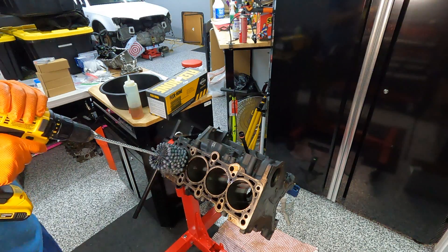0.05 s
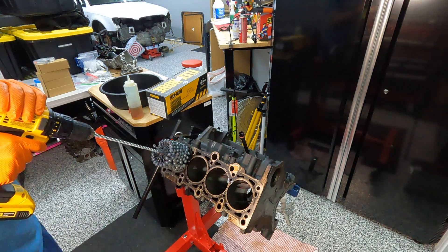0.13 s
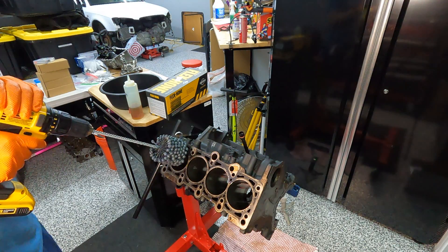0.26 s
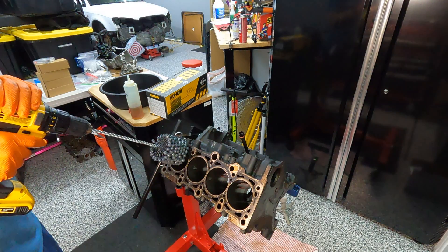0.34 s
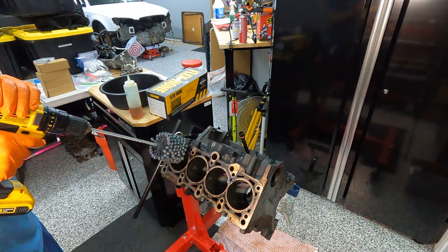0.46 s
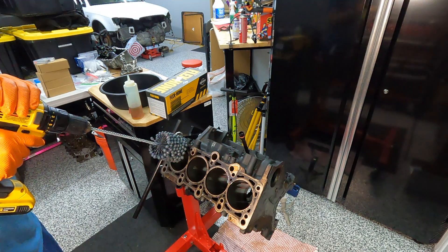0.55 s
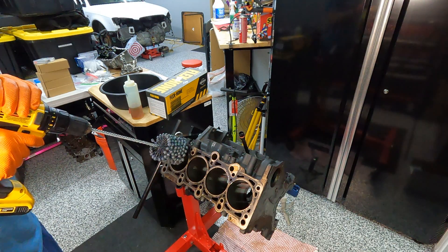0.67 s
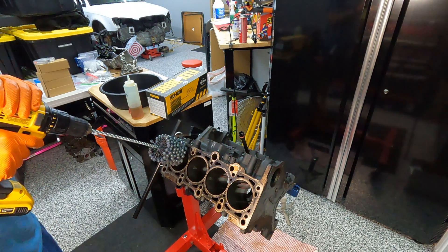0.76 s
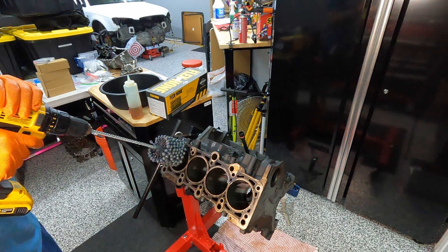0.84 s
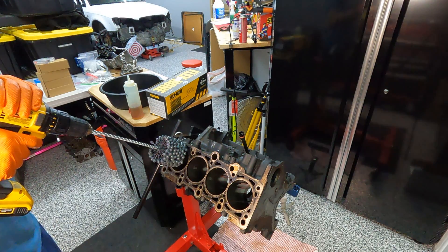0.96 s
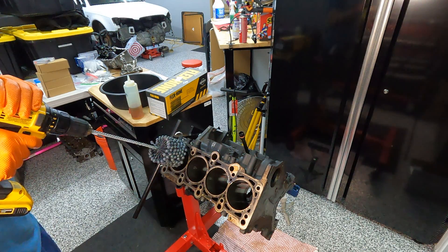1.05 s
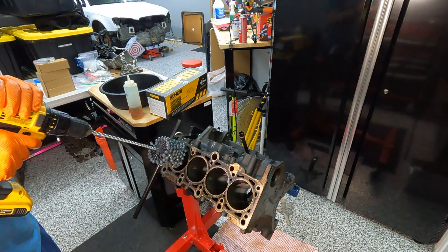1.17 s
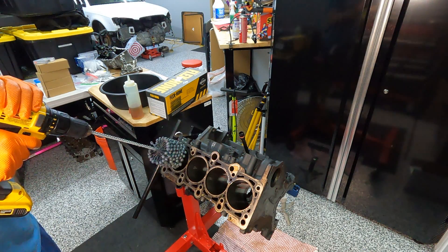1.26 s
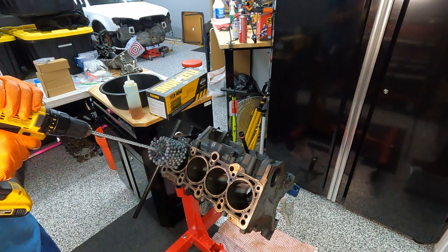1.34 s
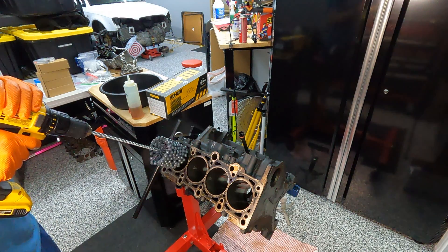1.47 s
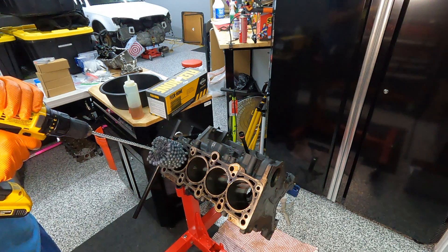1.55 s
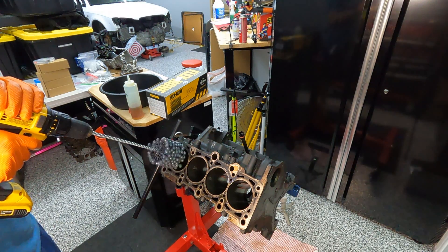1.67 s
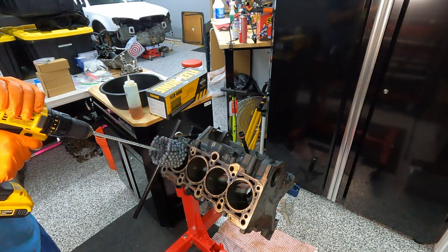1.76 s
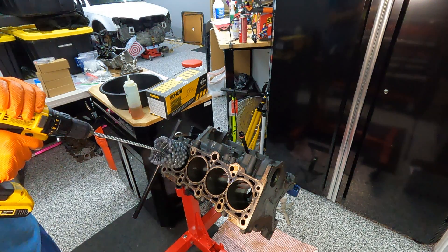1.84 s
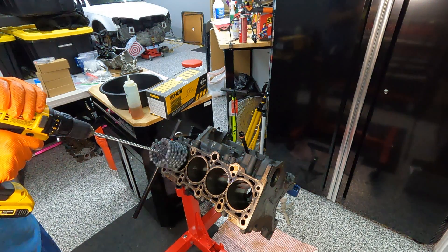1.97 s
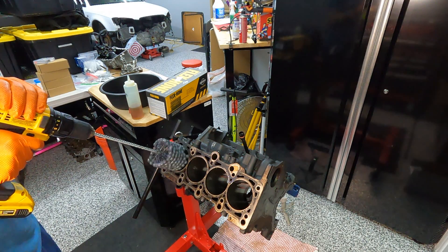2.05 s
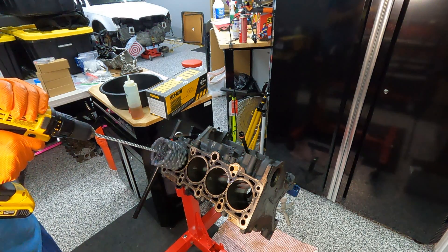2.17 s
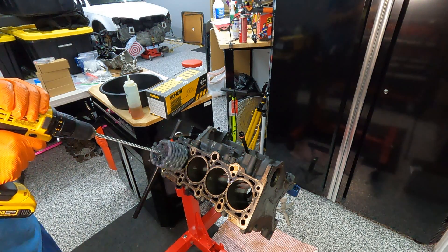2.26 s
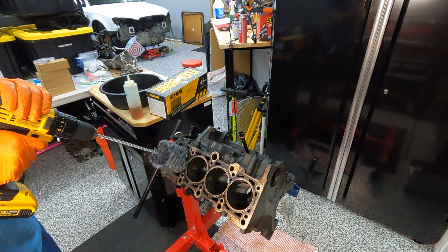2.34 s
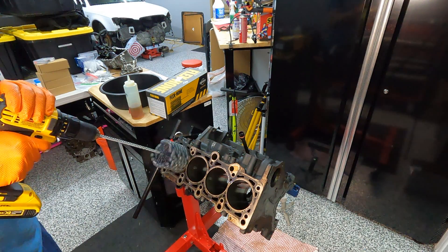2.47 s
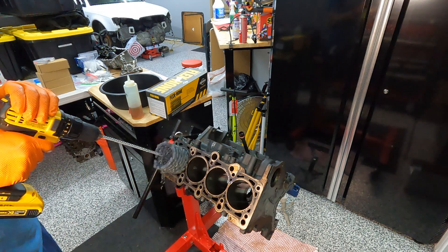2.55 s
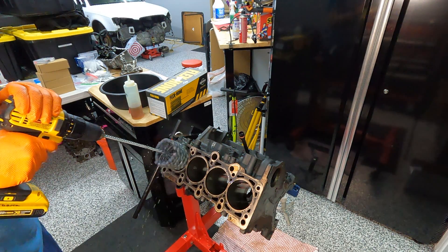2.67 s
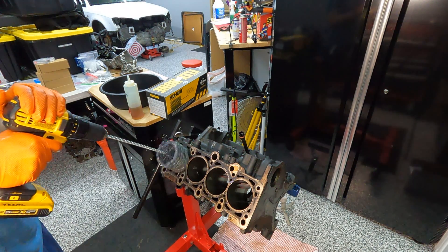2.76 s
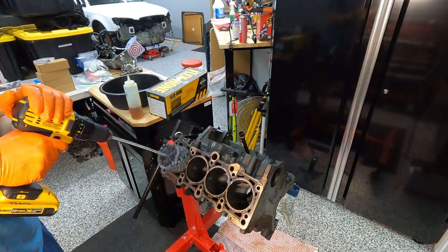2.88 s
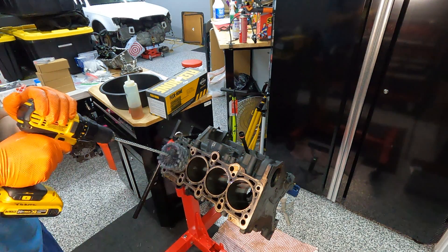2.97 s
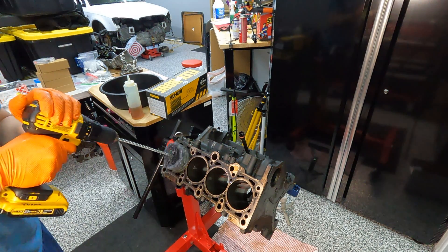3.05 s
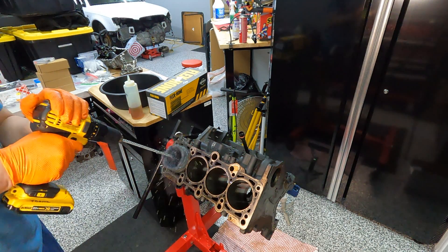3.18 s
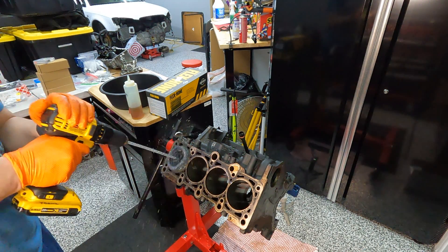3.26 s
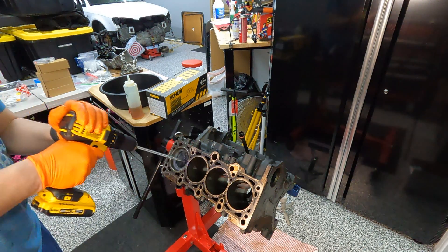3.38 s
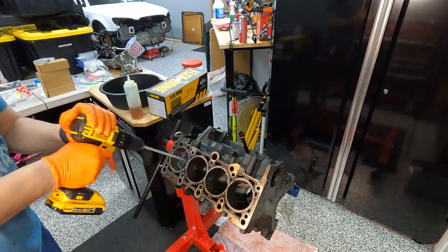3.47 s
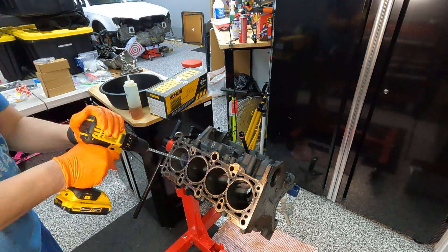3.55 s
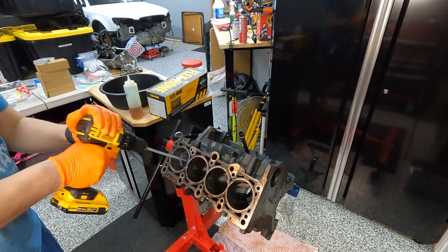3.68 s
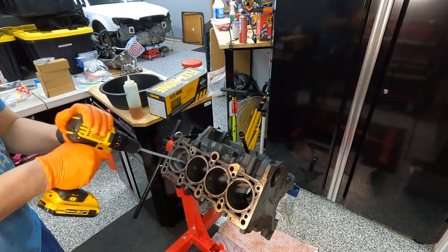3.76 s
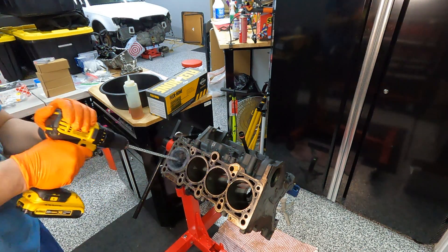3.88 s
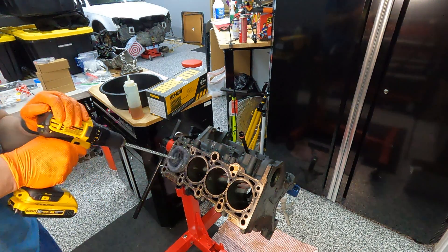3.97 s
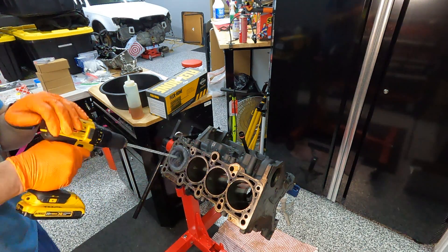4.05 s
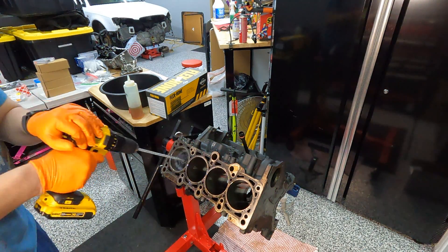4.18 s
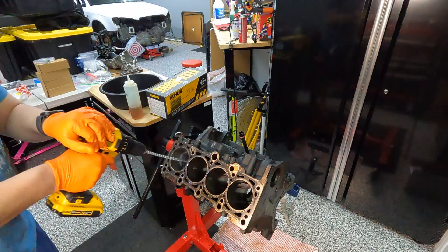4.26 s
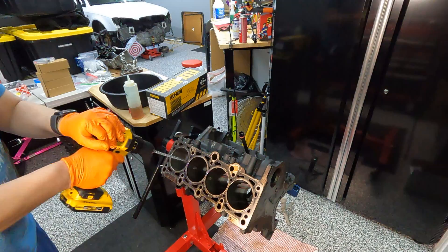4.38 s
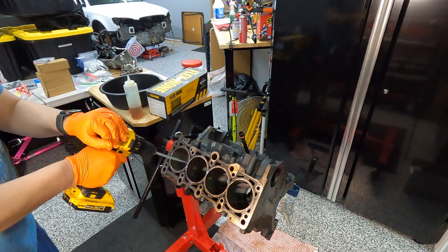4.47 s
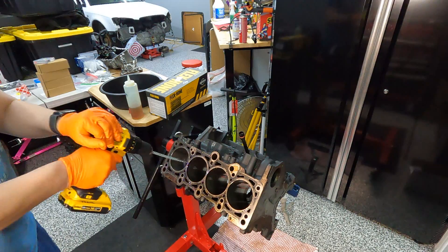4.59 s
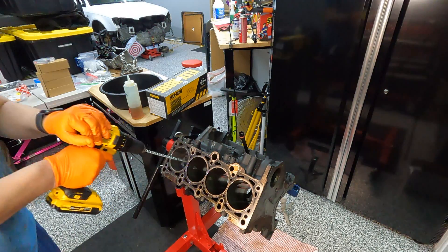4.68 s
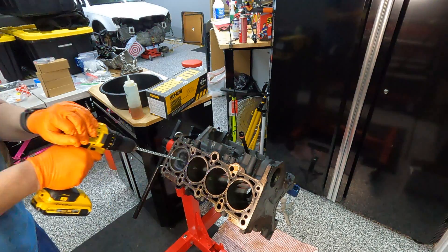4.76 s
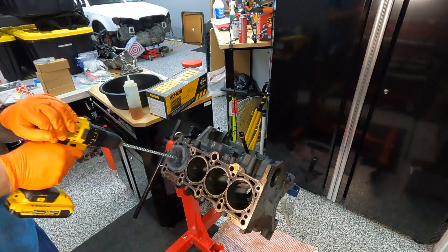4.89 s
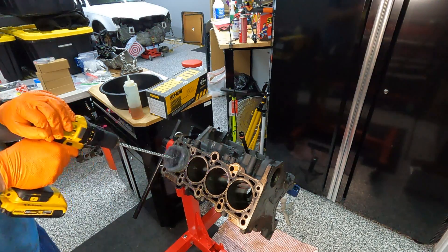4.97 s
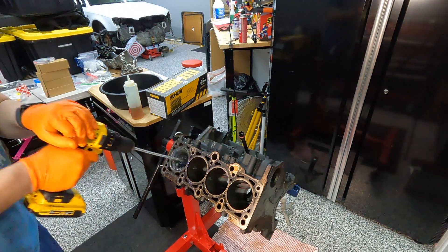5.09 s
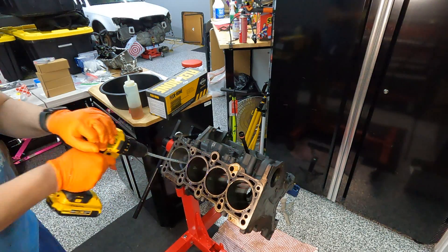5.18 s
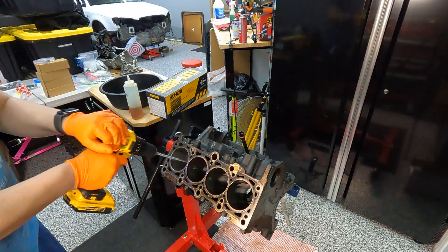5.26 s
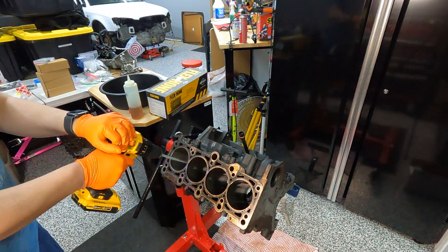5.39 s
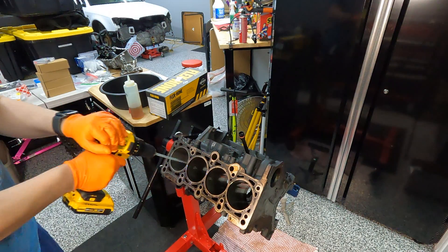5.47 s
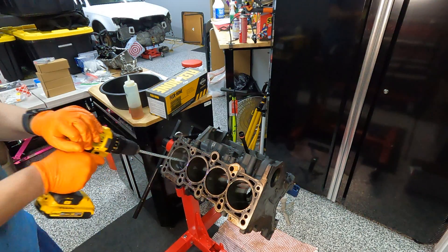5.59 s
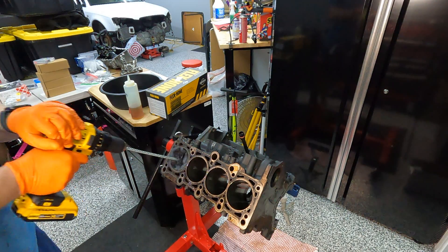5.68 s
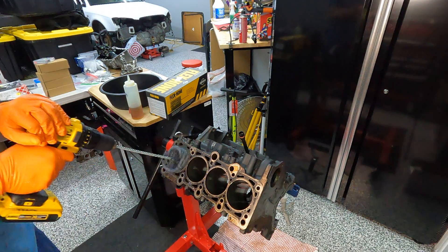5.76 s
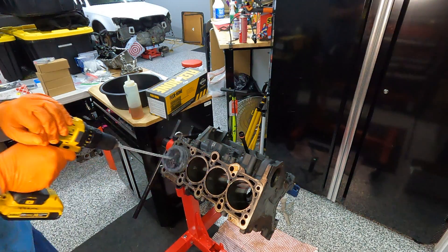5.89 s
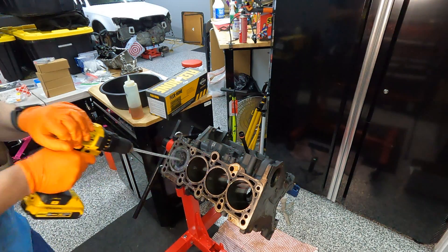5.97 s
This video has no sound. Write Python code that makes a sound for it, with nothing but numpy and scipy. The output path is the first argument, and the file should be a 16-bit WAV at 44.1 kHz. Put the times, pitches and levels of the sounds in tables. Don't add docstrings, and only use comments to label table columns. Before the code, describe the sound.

Faint low rubbing and short glove rustles come first over very quiet room tone. Then a drill motor starts small and whistling, rises in pitch for about two seconds and surges into a loud, wavering, multi-toned whine with airy hiss. Gritty scrapes come and go over it, ringing the iron block, while the whine sags slightly under load. Near, fairly dry garage sound, leaning left, still running at the end.

```python
import sys
import numpy as np
from scipy import signal
from scipy.io import wavfile
from scipy.ndimage import uniform_filter1d

SR = 44100
rng = np.random.default_rng(int(sys.argv[2]) if len(sys.argv) > 2 else 0)


def attenuation_scalar(level_db):
    decades = np.asarray(level_db, float) / 20
    return 10 ** decades


def transcribe(u):
    v = np.clip(np.atleast_2d(u).T, -1, 1)
    q = np.round(v * 32767).astype(np.int16)
    wavfile.write(sys.argv[1], SR, q)


N = 265923
HOP, SIZE = 256, 1024
T = np.arange(N) / SR
HZ = np.fft.rfftfreq(SIZE, 1 / SR)[:, None]
FRAME_T = np.arange(N // HOP + 5) * HOP / SR

# time in seconds, shaft speed asked for in Hz.
TRIGGER = [(1.29, 30), (1.323, 38), (1.55, 42), (1.639, 67.3), (1.76, 76.5), (1.84, 76.5), (1.93, 94),
           (2.095, 107), (2.195, 151), (2.413, 177.3), (2.608, 182), (2.765, 180.4), (2.964, 164.7),
           (3.063, 147.7), (3.141, 215.8), (3.201, 221.3), (3.282, 369.3), (3.616, 382.1)]
START_S = TRIGGER[0][0]
INERTIA_S, FULL_HZ = 0.065, 370
# middle in seconds, length in seconds, speed lost in Hz.
DRAGS = [
    (3.802, .688, 13.7),
    (4.266, .362, 9.6),
    (4.71, .568, 24.9),
    (5.548, .756, 25.4),
]

STRONG_ORDERS = (10, 16, 19, 20)
# full-speed level in dB, rise in dB per octave, share of the shade 0-1.
STRONG_DB = [(-38.5, 11.5, 0.2), (-39.5, 10, 0.28), (-37, 19, 0.4), (-36.5, 13, 0.78)]
# centre in Hz, width in Hz, lift in dB.
CASE_MODES = [(670, 180, 17), (1786, 290, 16), (2470, 540, 6.5), (5400, 350, -1), (2970, 130, 8.5)]
# time in seconds, lift of each strong order in dB.
GLINTS = [(3.25, 1.5, 7.5, -6, 4), (3.45, 3.5, 6, 3, 2), (3.65, -1, 1.5, 3, 6.5), (3.9, -0.5, 3, 3, 7),
          (4.1, 7.5, 10, 2, 0), (4.5, 8.5, 0.5, 0, 1), (4.8, 2.5, 5.5, -2, -4), (5.1, 9, 2.5, 0.5, -2),
          (5.3, 5, 4.5, 2, -7), (5.47, 4.5, 2, -0.5, 8), (5.72, 5, 4, 5, 8), (5.92, 8.5, -3, 5.5, 0.5)]
GLINT_S = 0.26
FADING_DB = 1.5
# dB at half speed, dB at full speed.
FLUTTER_DB = (1.3, 3.4)
STRONG_TORQUE = 0.49

LOW_ORDERS = (1, 2, 4)
LOW_DB = (-3, -1, 4)
UNBALANCE_DB = -53
UNBALANCE_OCTAVE_DB = (15.0, 16, 16.5)
# centre in Hz, width in Hz, lift in dB.
GRIP_MODE = [(180, 110, 8)]

WEAK_ORDERS = (18, 29, 30, 31, 32, 38, 39, 40, 41, 42, 47, 49, 50, 51, 59, 60, 63, 64, 68, 70, 79, 80, 90)
WEAK_DB = (-6.5, 0, 3.5, -8, -1.5, -20, 0.5, 1.5, -9, -1.5, -14, 5, -1, -8, 0, -7, 0, -17, 2, -11, -8, 0.5,
           1)
# centre in Hz, width in Hz, lift in dB.
HOUSING = [(2380, 1400, 7), (4500, 770, 7), (5920, 630, 9), (7750, 1600, 7)]
HOUSING_EDGE_HZ, HOUSING_FALL_DB = 7100, 28
DRIVE_DB, DRIVE_OCTAVE_DB, TORQUE_DB = -39.5, 9.5, 1
SIDE_OCTAVE_DB = 0.5
STIRS_HZ, STIRS_DB = 60, 7.0
FULL_ON_LIFT_DB = {30: 5, 38: 6, 40: 6}
FULL_ON_S = 0.2
RADIATES_HZ, RADIATES_DB = 1000, 22.0
# time in seconds, level change in dB.
SHADE = [
    (4.2, -0.5),
    (4.6, -5.5),
    (5.0, -8.5),
    (5.3, -5.5),
    (5.6, -15),
    (6.03, -8),
]

SWITCH_HZ = 3926
SWITCH_PARTS = [(1, 0), (1, -2), (1, 2), (1, -10), (1, 10), (2, -1), (2, 0), (2, 1), (2, -2), (2, 2),
                (3, 0), (3, -6), (3, 12)]
# level at the start in dB, change in dB per second.
SWITCH_DB = [(-62, 10), (-59, 5), (-57, 3), (-60, 6.5), (-57, 4), (-53, -6), (-55, -1.5), (-66, -3),
             (-70, -3), (-68, -3), (-69, -2.5), (-78, -16), (-74, -40)]
# time in seconds, level in dB.
SWITCH = [
    (1.29, -17),
    (1.33, -2.5),
    (1.4, -2),
    (1.8, 2.5),
    (2.1, 2),
    (2.5, 2.5),
    (2.9, -3.5),
    (3.2, -6.5),
    (3.3, -30),
]
UNCHOPPED_S = SWITCH[-1][0]

# frequency in Hz, density in dB per Hz.
HISS_SLOW = [(120, -51), (190, -25.5), (420, -19.5), (540, -12), (917, -7), (1490, -5.5), (1760, -0.5),
             (2340, -8), (2750, -1), (3230, -5.5), (5720, 1), (12300, -23), (13300, -28), (15500, -62)]
# frequency in Hz, density in dB per Hz.
HISS_FAST = [(71, -66), (120, -35), (676, -11), (733, -15.5), (863, -8.5), (1460, -6), (3440, -6),
             (3730, -5), (3960, -3.5), (6080, -1), (11400, -19.5), (12900, -18.5), (15500, -62)]
# centre in Hz, width in Hz, lift in dB.
HISS_MODES = [(12000, 330, 14.5), (6640, 530, -1.5)]
# first in Hz, last in Hz.
CHOP_FADES_HZ = (89, 214)
HISS_DB, HISS_OCTAVE_DB, HISS_KNEE_HZ, HISS_RISE_S = -37, 9, 202.5, 0.065

# middle in seconds, length in seconds, level in dB.
STROKES = [
    (2.75, .7, -43),
    (2.86, .1, -38),
    (3.05, 0.22, -27),
    (3.27, 0.25, -25.5),
    (3.77, 0.31, -25.5),
    (4.22, 0.18, -27.5),
    (4.64, 0.57, -21.5),
    (5.08, 0.22, -39),
    (5.5, 0.48, -20.5),
    (5.93, .2, -38),
]
# frequency in Hz, density in dB per Hz.
SCRAPE = [(150, -55), (250, -22.5), (359, -31), (420, -56), (525, -8.5), (852, -23), (1220, -1),
          (1670, -61), (1790, 1), (1950, -9.5), (3570, 1.5), (11900, -11.5), (15500, -27)]
# centre in Hz, width in Hz, lift in dB.
BLOCK = [(283.3, 35, 24.5), (1250, 28, -4), (2118, 19.2, 22), (2390, 92, 4), (2540, 49, 14.5),
         (2943, 37, 21.5), (3200, 37, -4), (3550, 49, -20), (5200, 41, -26), (5530, 39, -14)]
# middle in seconds, length in seconds, centre in Hz, width in Hz, lift in dB.
BORE_RINGS = [
    (3.72, 0.28, 2550, 38.7, 4),
    (4.22, 0.11, 2110, 900, 12),
]
# middle in seconds, length in seconds, pitch in Hz, level in dB.
BLOCK_NOTES = [
    (.52, 0.1, 273.4, -63),
    (0.754, 0.098, 278, -58),
    (4.73, 0.17, 1830, -38),
    (4.65, 0.27, 2940, -38.5),
    (5.512, 0.23, 1590, -47.5),
    (5.504, 0.45, 2940, -41.5),
    (5.53, 0.14, 2430, -38.5),
    (5.957, .1, 1250, -45.5),
]
# time in seconds, left over right in dB.
PAN = [
    (1.29, 6),
    (2.0, 2.5),
    (2.7, 3.5),
    (3.6, 2),
    (4.3, 2.5),
    (4.6, 1),
    (5.1, 2.5),
    (5.6, 1),
    (6.03, 3),
]
# time in seconds, crack in dB, ring in Hz, ring level in dB.
TICKS = [
    (.860, -70, 5500, -65),
    (1.0314, -68, 11500, -81),
    (1.037, -67, 1180, -60),
    (1.1144, -66, 11500, -81),
    (1.291, -60, 7750, -55),
    (3.04, -34, 12000, -39),
]

# frequency in Hz, density in dB per Hz.
RUSTLE = [(410, -48), (700, -5), (893, -20), (977, -11), (1070, -2), (1280, -8.5), (5590, -3.5),
          (12200, -21), (15000, -37)]
# middle in seconds, length in seconds, level in dB.
RUSTLES = [
    (.03, 0.17, -57.5),
    (.41, .1, -62),
    (.6, 0.073, -65),
    (.72, 0.61, -70.5),
    (.87, 0.048, -73),
    (1.04, .1, -79),
    (1.1, 0.77, -93),
    (1.32, 0.047, -58.5),
]
# frequency in Hz, density in dB per Hz.
RUB = [(65, -47), (110, -31), (178, -3.5), (235, -9), (275, -7), (488, -14), (668, -24), (792, -24.5),
       (2500, -33), (3250, -65), (5500, -120)]
# centre in Hz, width in Hz, lift in dB.
RUB_MODES = [(180, 30, 1), (414, 48, -2), (490, 22, 8)]
# middle in seconds, length in seconds, centre in Hz, width in Hz, lift in dB.
RUB_RINGS = [
    (.25, 0.32, 169, 29.4, 15),
    (.83, 0.12, 180, 27, 7.8),
]
# middle in seconds, length in seconds, level in dB.
RUBS = [
    (.0, 0.29, -76),
    (.27, 0.39, -57.5),
    (.55, .14, -58),
    (.8, 0.31, -54.5),
    (1.04, .14, -60.5),
    (1.2, 0.45, -69.5),
]

# frequency in Hz, density in dB per Hz.
ROOM_TONE = [(65, -37), (110, -34), (156, 1), (308, -53), (386, -38), (658, -42), (1060, -28), (15000, -63)]
ROOM_DB = -64.5
# frequency in Hz, density in dB per Hz.
RUMBLE_TONE = [(8.8, -32), (15, -2), (43, 5.5), (110, -20), (140, -48), (240, -120)]
RUMBLE_DB = -73
# middle in seconds, length in seconds, level in dB.
GUSTS = [
    (.1, 0.52, -64),
    (.75, 0.63, -65),
    (1.4, 1.4, -70),
    (3.2, 1.2, -70),
    (5.6, 0.38, -65),
]
# frequency in Hz, likeness 0-1.
SAME = [(75, 0.89), (150, 0.71), (300, 0.8), (1200, 0.87), (2500, 0.65), (5000, 0.83), (9000, 0.76),
        (13000, 0.49)]


def speed(t):
    wish = column(TRIGGER, 1, T, before=0)
    wish = wish - sum(hz * np.exp(-(2 * (T - s) / length) ** 2) for s, length, hz in DRAGS)
    keep = np.exp(-1 / (INERTIA_S * SR))
    return np.interp(t, T, signal.lfilter([1 - keep], [1, -keep], wish))


def shaft_turns():
    hunt = np.interp(T, FRAME_T, 1 + 0.0008 * drift(25.0))
    return np.cumsum(speed(T) * hunt) / SR


def radiation_loss_db(hz):
    return RADIATES_DB * np.log2(np.maximum(RADIATES_HZ / hz, 1))


def whine(turns):
    out = np.zeros((2, N))
    hz = speed(FRAME_T) + 1
    octaves = np.log2(hz / FULL_HZ)
    shade_db = column(SHADE, 1, FRAME_T)
    full_on = np.clip((FRAME_T - UNCHOPPED_S) / FULL_ON_S, 0, 1)
    torque_db = TORQUE_DB * np.log2(1 + np.maximum(np.gradient(hz, FRAME_T), 0) / 150)
    glints_db = sum(np.array(lift)[:, None] * np.exp(-(2 * (FRAME_T - s) / GLINT_S) ** 2) for s, *lift in GLINTS)
    flutter_db = np.interp(octaves, (-1, 0), FLUTTER_DB)

    for k, (db, octave_db, share), glint_db in zip(STRONG_ORDERS, STRONG_DB, glints_db):
        level_db = db + octave_db * octaves + share * shade_db + glint_db + STRONG_TORQUE * torque_db
        level_db = level_db + bumps(CASE_MODES, k * hz) - radiation_loss_db(k * hz) + FADING_DB * drift(6.0)
        add(out, k * turns, level_db, flutter_db, skew=0.25)

    for k, db, octave_db in zip(LOW_ORDERS, LOW_DB, UNBALANCE_OCTAVE_DB):
        level_db = UNBALANCE_DB + db + octave_db * octaves + 0.27 * shade_db + bumps(GRIP_MODE, k * hz)
        add(out, k * turns, level_db, waver_db=2.5, skew=0.091)

    drive_db = DRIVE_DB + DRIVE_OCTAVE_DB * octaves + torque_db + shade_db
    drive_db = drive_db - STIRS_DB * np.log2(np.maximum(STIRS_HZ / hz, 1))
    for k, db in zip(WEAK_ORDERS, WEAK_DB):
        fall_db = HOUSING_FALL_DB * np.log2(np.maximum(k * hz / HOUSING_EDGE_HZ, 1))
        fall_db = fall_db + 100 * (k * hz > SR / 2.5)
        side_db = SIDE_OCTAVE_DB * (octaves + 1) * (k % 10 > 0)
        level_db = db + drive_db + side_db + bumps(HOUSING, k * hz) - fall_db - radiation_loss_db(k * hz)
        level_db = level_db + FULL_ON_LIFT_DB.get(k, 0) * full_on
        add(out, k * turns, level_db, waver_db=3.0, skew=0.35)
    return out


def whistle(turns):
    out = np.zeros((2, N))
    since = FRAME_T - START_S
    level_db = column(SWITCH, 1, FRAME_T) - 200 * (FRAME_T > UNCHOPPED_S)
    for (m, k), (db, slope) in zip(SWITCH_PARTS, SWITCH_DB):
        add(out, m * SWITCH_HZ * T + k * turns, level_db + db + slope * since, waver_db=4.0, skew=0.37)
    full_db = np.interp(FRAME_T, [3.36, 3.45, 4.3, 4.5], [-90, -58, -60, -80], left=-120)
    add(out, 24000 * T - 30 * turns, full_db, waver_db=2.5, skew=0.5)
    return out


def hiss(turns):
    hz = speed(FRAME_T)
    fast = np.clip((hz - 180) / 185, -0.4, 1)
    chopped = np.interp(hz, CHOP_FADES_HZ, (1, 0.3))
    slow_db = read(HISS_SLOW, HZ) + bumps(HISS_MODES, HZ) * chopped
    x = noise(slow_db * (1 - fast) + read(HISS_FAST, HZ) * fast, 0.8, 0.4, lo_hz=450, hi_hz=1300)
    treble = signal.sosfilt(signal.butter(2, 8500, "high", fs=SR, output="sos"), x)
    sparks = attenuation_scalar(2.2 * evened(uniform_filter1d(rng.standard_normal(N), size=250)))
    x = x + treble * (evened(sparks) - 1)
    level_db = HISS_DB - HISS_OCTAVE_DB * np.log2(1 + (HISS_KNEE_HZ / (speed(T) + 1)) ** 2) / 2
    rise = np.clip((T - START_S) / HISS_RISE_S, 0, 1) ** 2
    throb = 1 + 0.08 * np.sin(2 * np.pi * turns)
    return x * attenuation_scalar(level_db) * rise * throb


def scrape():
    grit = attenuation_scalar(0.8 * evened(uniform_filter1d(rng.standard_normal(N), size=80)))
    x = noise(read(SCRAPE, HZ) + bumps(BLOCK, HZ) + passing(BORE_RINGS), 0.7, 0.5)
    return x * evened(grit) * swells(STROKES, T, edge=3.9)


def block_notes():
    out = np.zeros((2, N))
    for s, length, hz, db in BLOCK_NOTES:
        turns = np.cumsum(hz * np.interp(T, FRAME_T, 1 + 0.003 * drift(20.0))) / SR
        level_db = db - 9 * (2 * (FRAME_T - s) / length) ** 4
        add(out, turns, level_db, waver_db=3.0, skew=0.25, start=0)
    return out


def ticks():
    out, t = np.zeros(N), np.arange(1500) / SR
    for s, crack_db, hz, ring_db in TICKS:
        crack = np.diff(rng.standard_normal(len(t) + 1)) * np.exp(-t / 0.0008)
        wander = 0.5 * np.cumsum(rng.standard_normal(len(t))) * np.sqrt(hz / SR)
        ring = np.sin(2 * np.pi * hz * t + wander) * np.exp(-t / 0.0091)
        out[round(s * SR):][:len(t)] += attenuation_scalar(crack_db) * crack + attenuation_scalar(ring_db) * ring
    return out


def hands():
    rustle = noise(read(RUSTLE, HZ), 1.0, 1.5, until=240) * swells(RUSTLES, T, edge=1.6)
    rub_db = read(RUB, HZ) + bumps(RUB_MODES, HZ) + passing(RUB_RINGS)
    rub = noise(rub_db, 1.0, 1.5, until=240) * swells(RUBS, T, edge=2.2)
    return rustle + rub


def room_tone():
    return attenuation_scalar(ROOM_DB) * noise(read(ROOM_TONE, HZ), 1.2, 0.6)


def rumble():
    return (attenuation_scalar(RUMBLE_DB) + swells(GUSTS, T, edge=2)) * noise(read(RUMBLE_TONE, HZ), 1.5, 1.5)


def add(mix, turns, level_db, waver_db, skew, start=START_S):
    lag = skew * (drift(4.9) + 0.13 * rng.standard_normal())
    gain = np.sqrt(2) * attenuation_scalar(level_db + waver_db * drift(30.0))
    heard = np.flatnonzero(level_db > -95) * HOP
    part = slice(max(heard[0], round(start * SR)), heard[-1]) if len(heard) else slice(0)
    lag = np.interp(T[part], FRAME_T, lag)
    phase = 2 * np.pi * (turns[part] + rng.random()) + np.array([lag, -lag])
    mix[:, part] += np.interp(T[part], FRAME_T, gain) * np.sin(phase)


def noise(shape_db, patchy_db, flicker_db, lo_hz=20, hi_hz=20000, until=None):
    frames = len(FRAME_T[:until])
    a, b, c, d, patches = rng.standard_normal((frames, len(HZ), 5)).T
    patches = uniform_filter1d(patches, size=14, axis=0)
    patches = evened(uniform_filter1d(patches, size=10, axis=1))
    gain = (attenuation_scalar(shape_db) * np.ones((len(HZ), len(FRAME_T))))[:, :frames]
    band = (HZ[:, 0] > lo_hz) & (HZ[:, 0] < hi_hz)
    gain = gain / np.sqrt((gain[band] ** 2).sum(0))
    same = np.clip(read(SAME, HZ), 0, 1)
    left = a + 1j * b
    right = same * left + np.sqrt(1 - same ** 2) * (c + 1j * d)
    flicker = flicker_db * rng.standard_normal(frames)
    z = np.array([left, right]) * gain * attenuation_scalar(patchy_db * patches + flicker)
    x = signal.istft(z, nperseg=SIZE, noverlap=SIZE - HOP)[1][:, :N]
    x = np.pad(x, ((0, 0), (0, N - x.shape[1])))
    return x / (np.sqrt(SIZE) / 16 * np.sqrt(2 / 3))


def drift(rate_hz):
    f = rate_hz * 10 ** -rng.random((12, 1))
    return evened(np.sin(2 * np.pi * (f * FRAME_T + rng.random((12, 1)))).sum(0))


def bumps(modes, hz):
    return sum(db / (1 + (2 * (hz - f) / w) ** 2) for f, w, db in modes)


def passing(rings):
    return sum(bumps([(f, w, db)], HZ) * np.exp(-(2 * (FRAME_T - s) / length) ** 4)
               for s, length, f, w, db in rings)


def swells(rows, t, edge):
    return sum(attenuation_scalar(db) * np.exp(-abs(2 * (t - s) / length) ** edge) for s, length, db in rows)


def evened(x):
    return x / np.sqrt(np.mean(x ** 2) + 1e-20)


def read(points, hz):
    f, value = np.transpose(points)
    return np.interp(np.log(hz + 1), np.log(f + 1), value)


def column(rows, index, t, before=None):
    rows = np.array(rows, float)
    return np.interp(t, rows[:, 0], rows[:, index], left=before)


def scene():
    turns = shaft_turns()
    drill = whine(turns) + whistle(turns) + hiss(turns) + scrape()
    drill = signal.sosfilt(signal.butter(4, 130, "high", fs=SR, output="sos"), drill)
    pan_db = column(PAN, 1, T)
    drill = drill * attenuation_scalar(np.array([pan_db, -pan_db]) / 2)
    return drill + block_notes() + ticks() + hands() + room_tone() + rumble()


def top_cut(x):
    return signal.sosfilt(signal.butter(12, 15630, fs=SR, output="sos"), x)


def record(dry):
    dull = signal.sosfilt(signal.butter(8, 14700, fs=SR, output="sos"), dry)
    return top_cut(dull)


dry = scene()
out = record(dry)
transcribe(out)
```